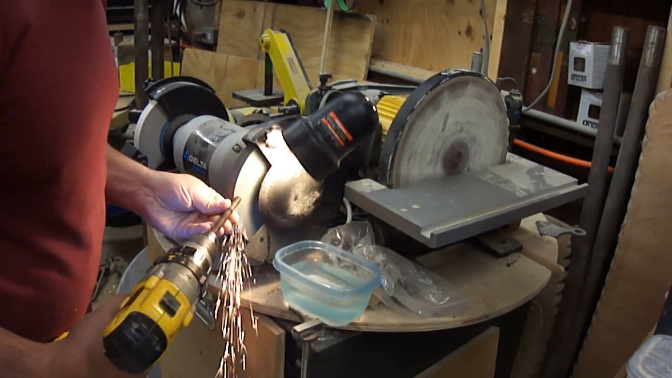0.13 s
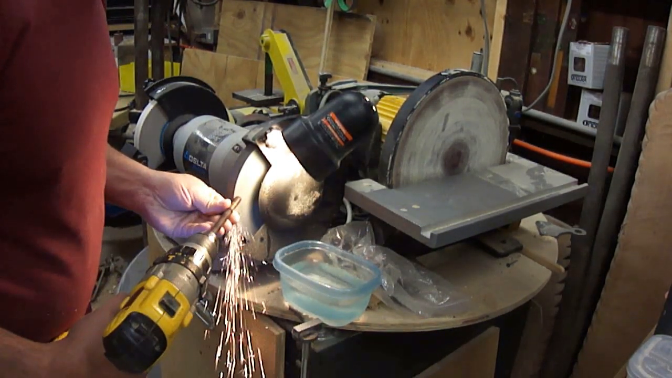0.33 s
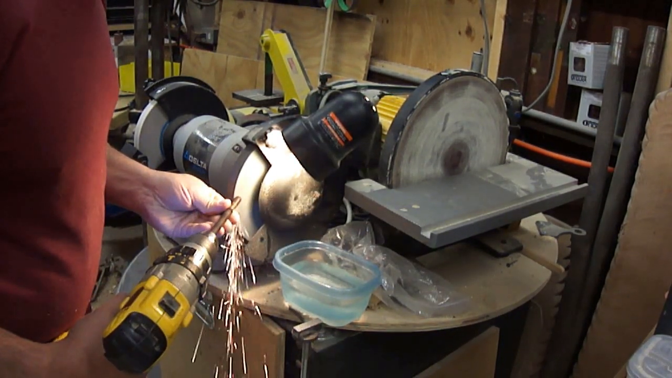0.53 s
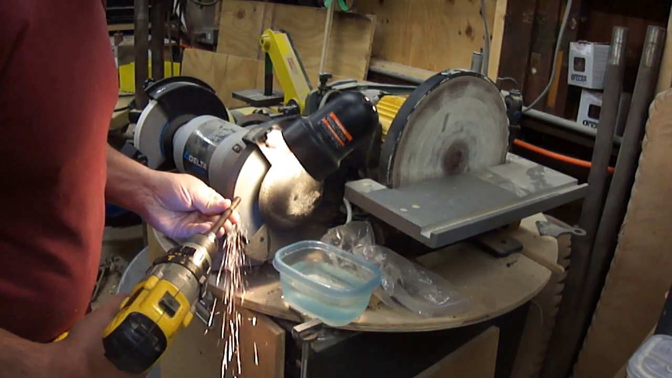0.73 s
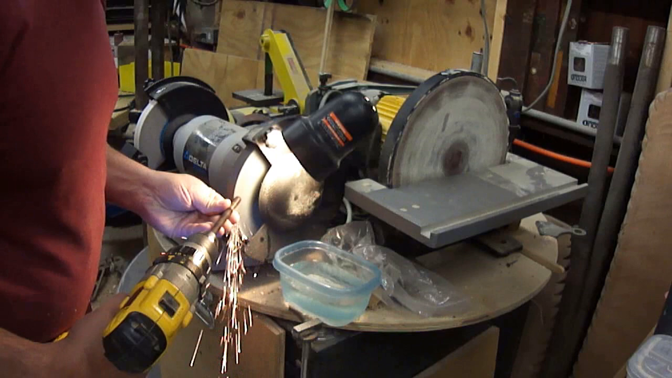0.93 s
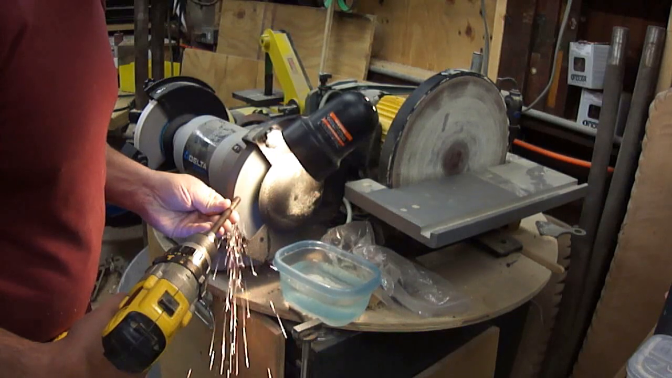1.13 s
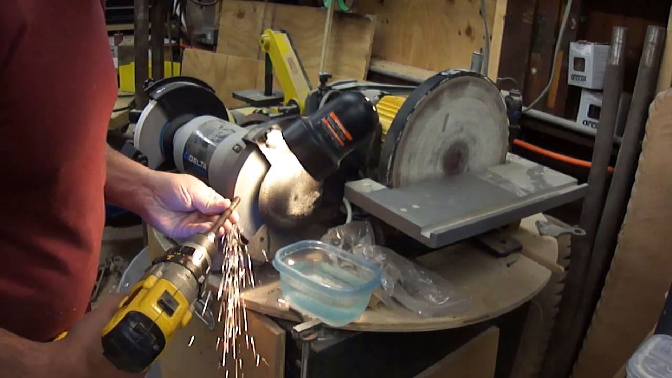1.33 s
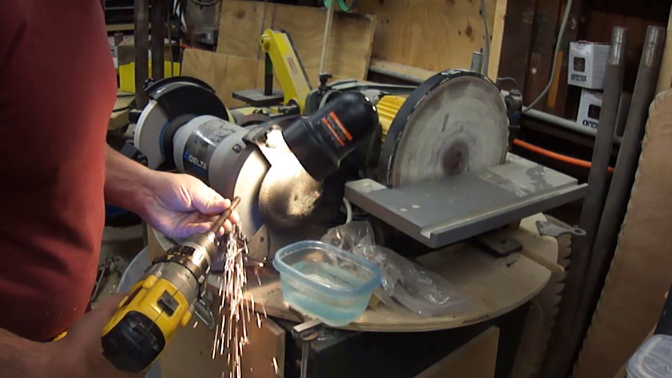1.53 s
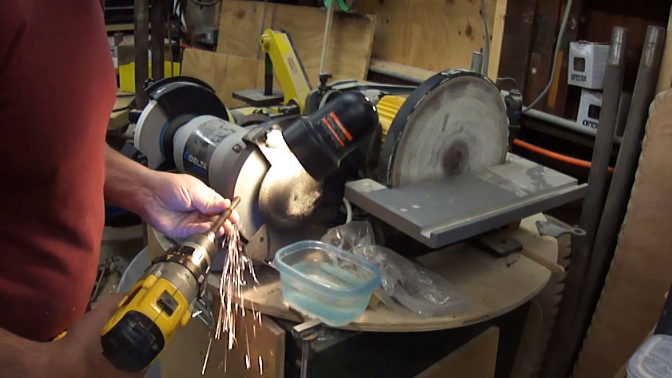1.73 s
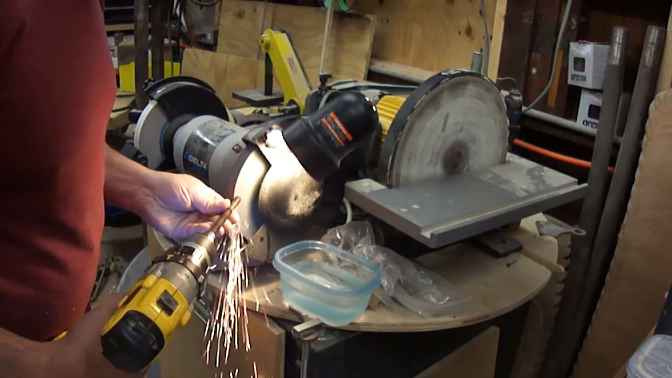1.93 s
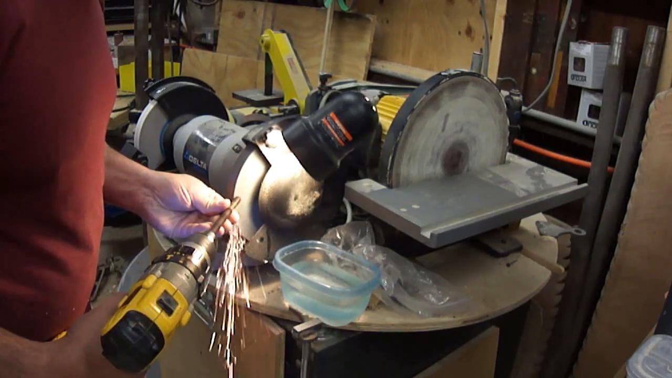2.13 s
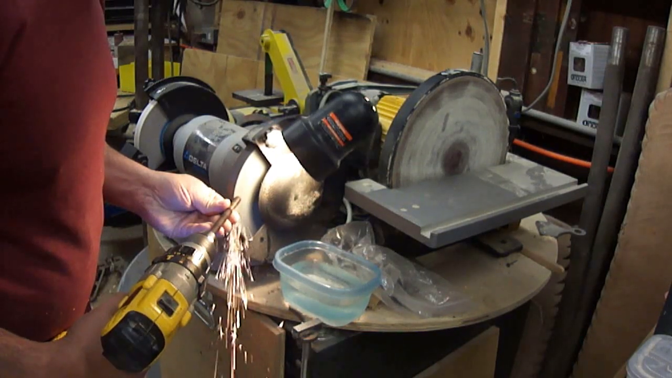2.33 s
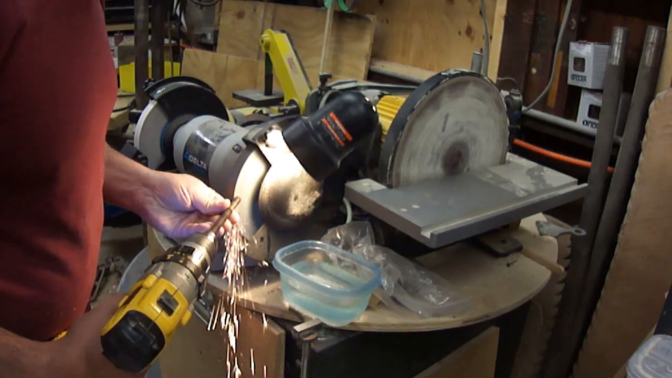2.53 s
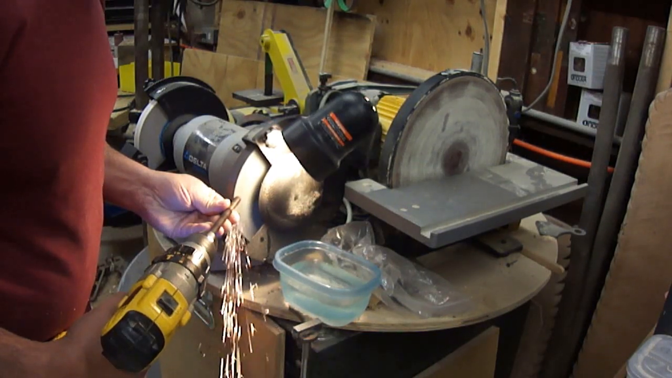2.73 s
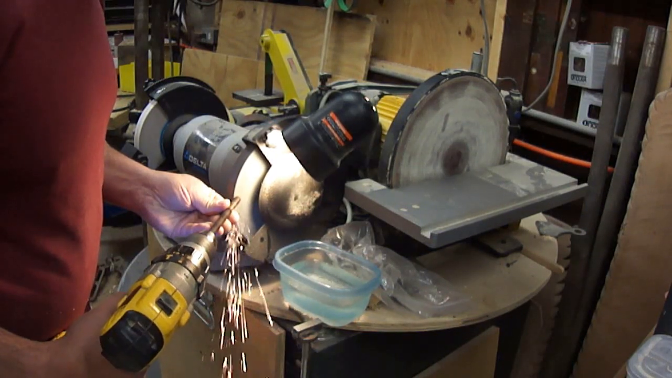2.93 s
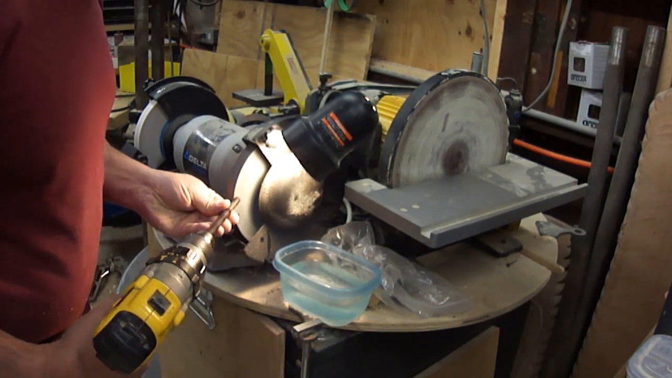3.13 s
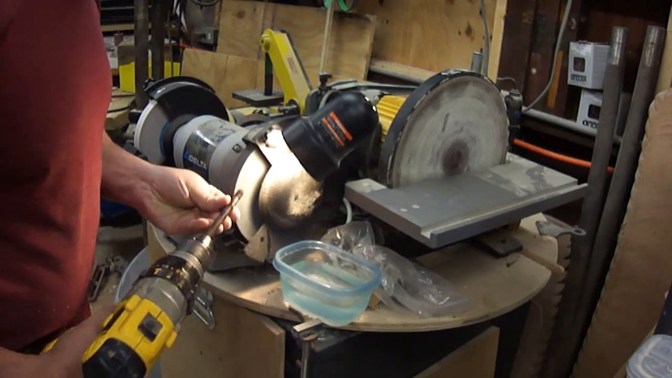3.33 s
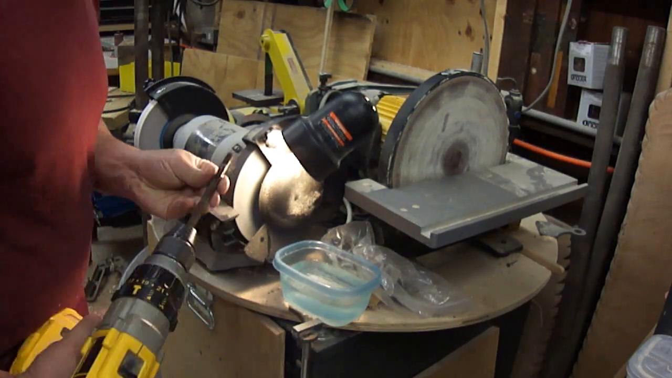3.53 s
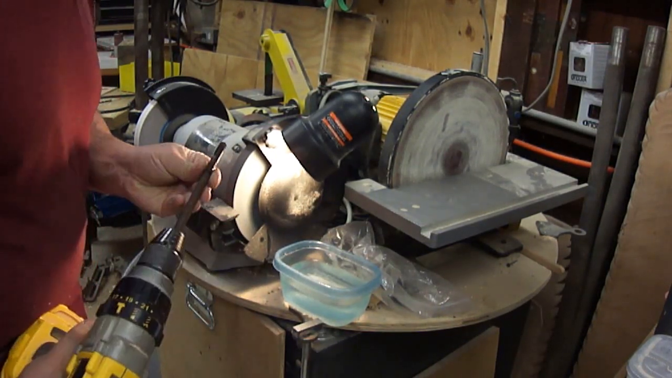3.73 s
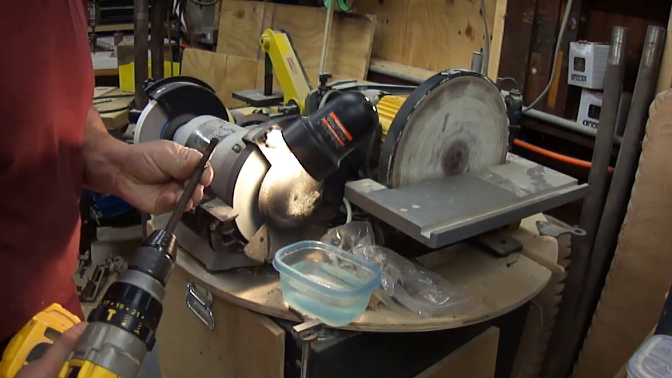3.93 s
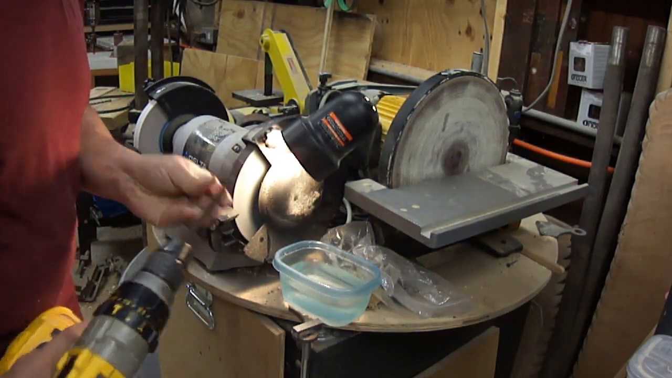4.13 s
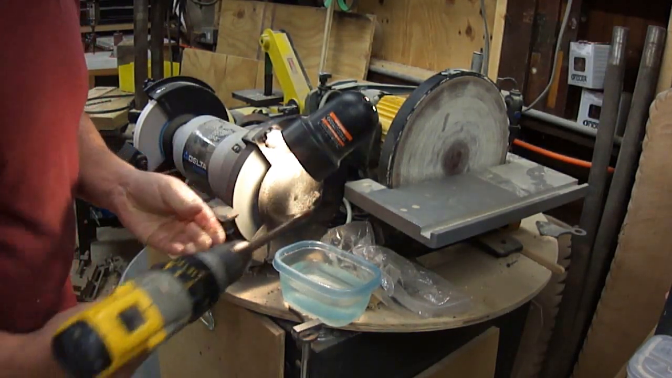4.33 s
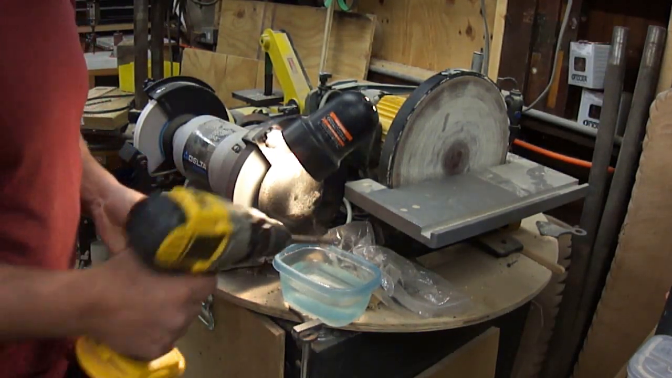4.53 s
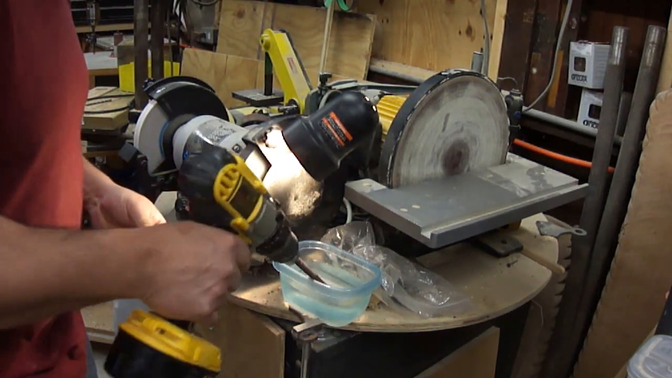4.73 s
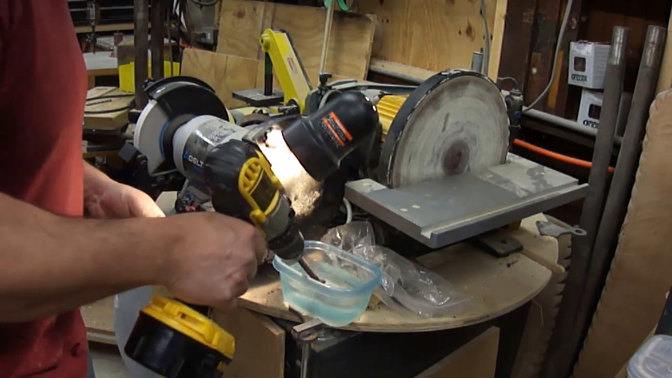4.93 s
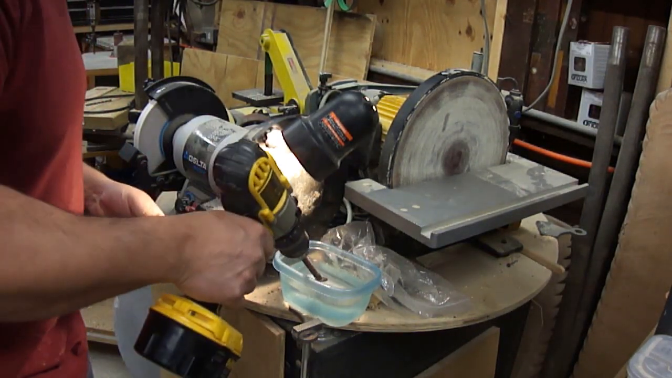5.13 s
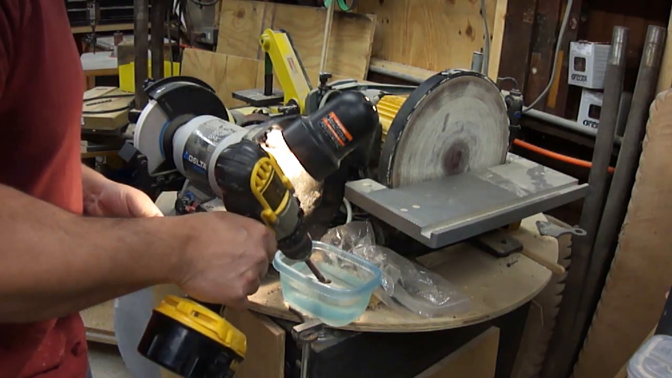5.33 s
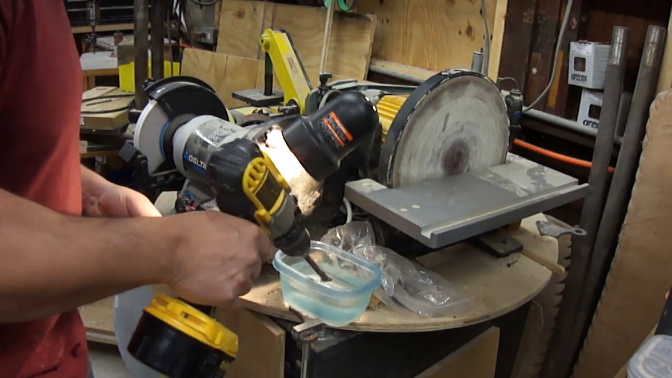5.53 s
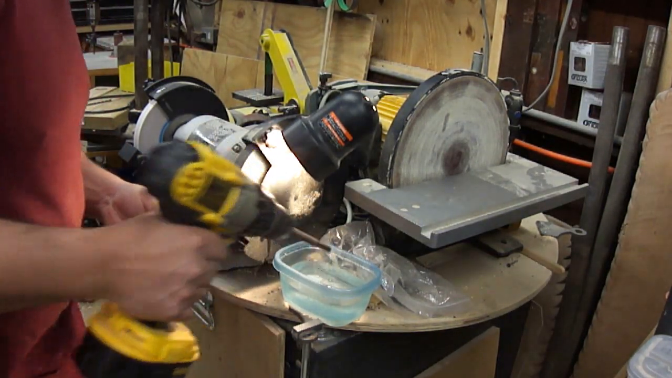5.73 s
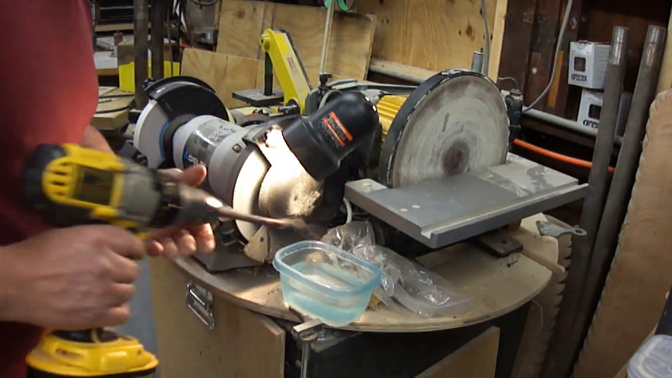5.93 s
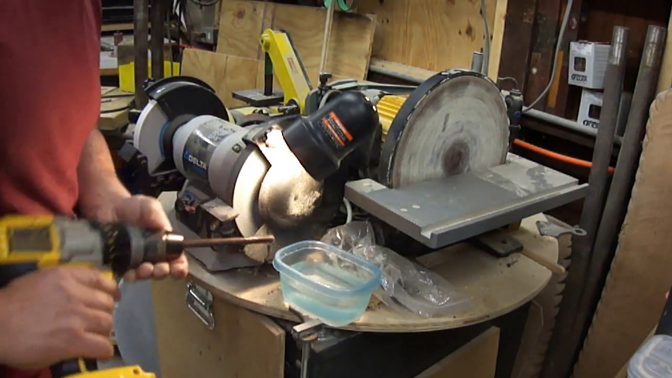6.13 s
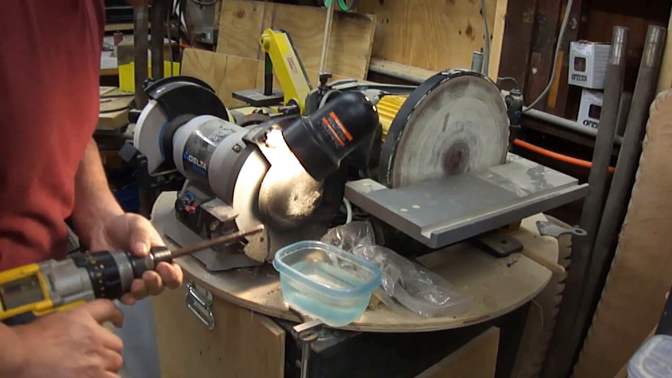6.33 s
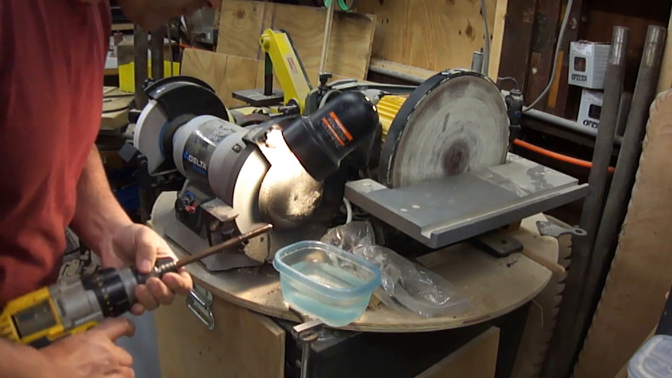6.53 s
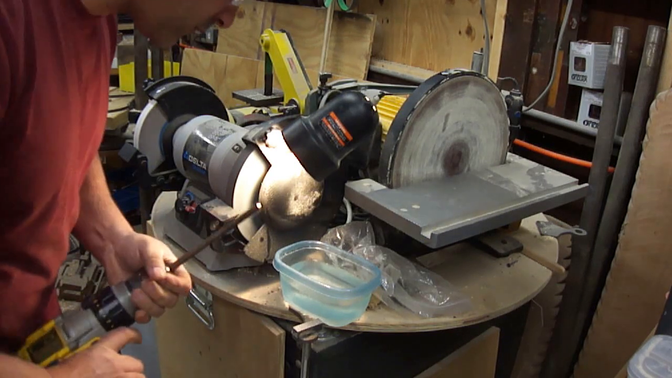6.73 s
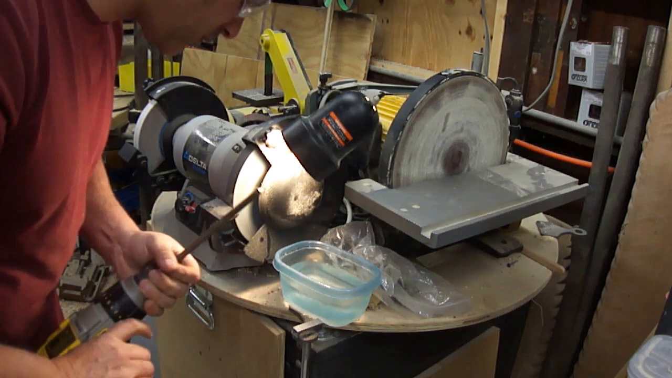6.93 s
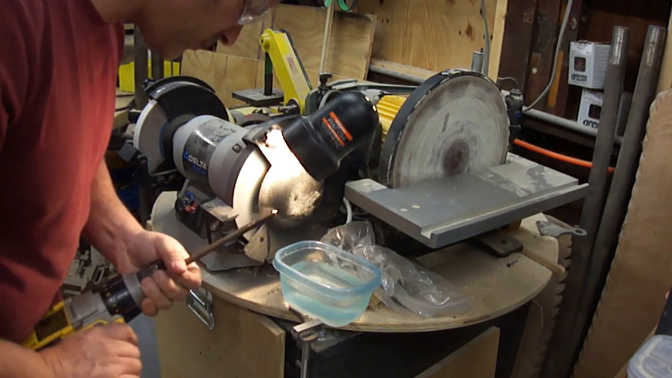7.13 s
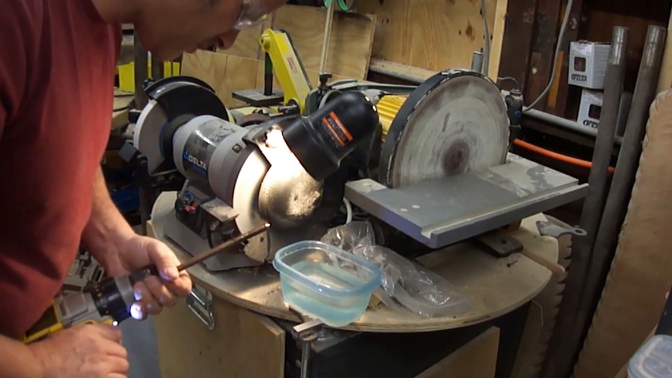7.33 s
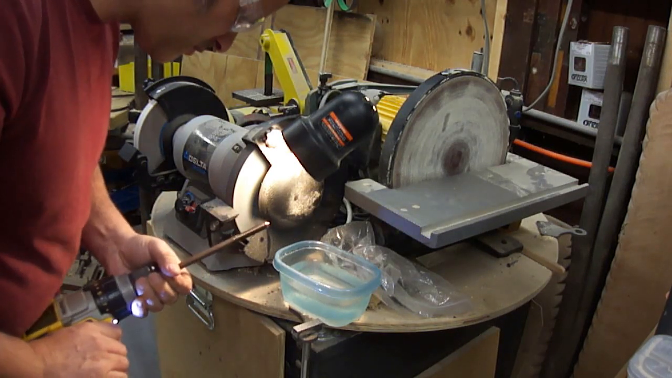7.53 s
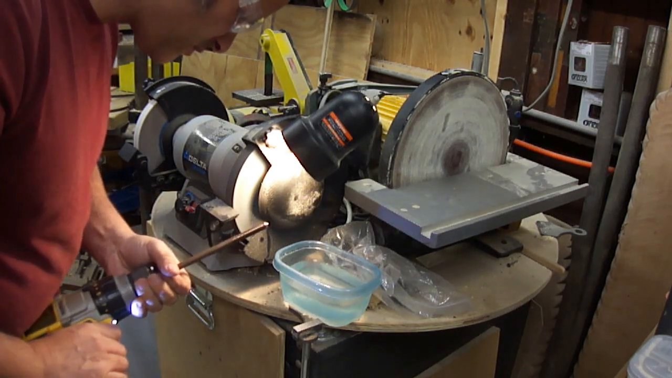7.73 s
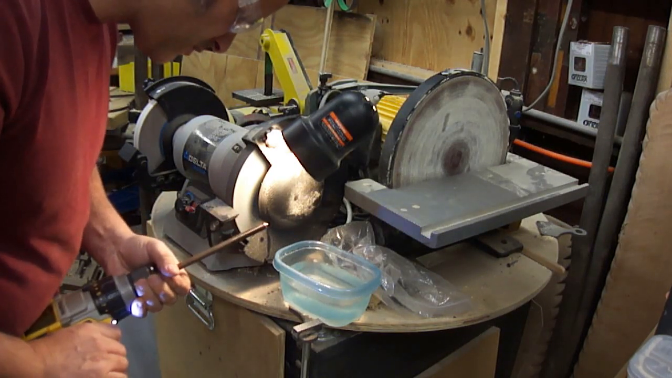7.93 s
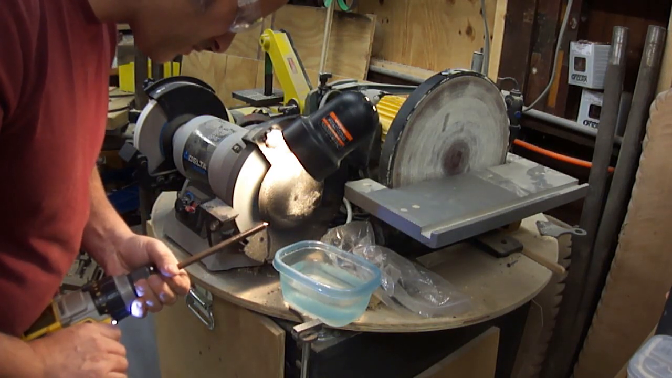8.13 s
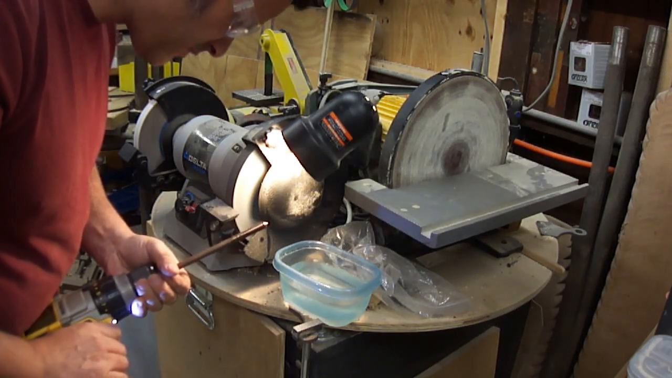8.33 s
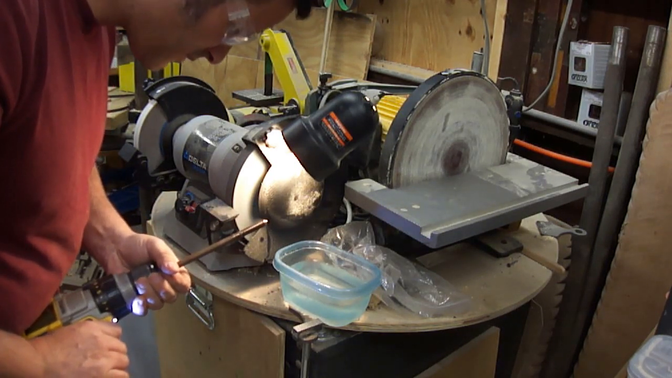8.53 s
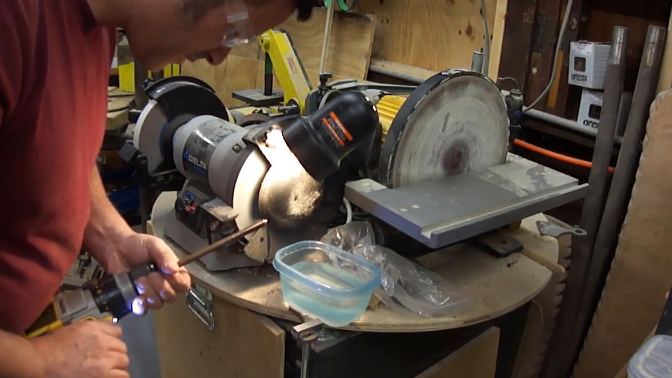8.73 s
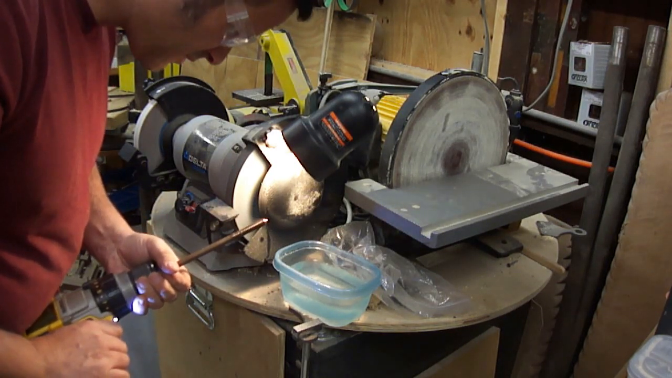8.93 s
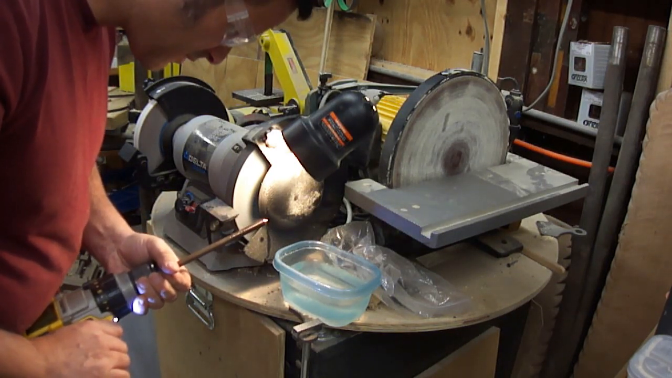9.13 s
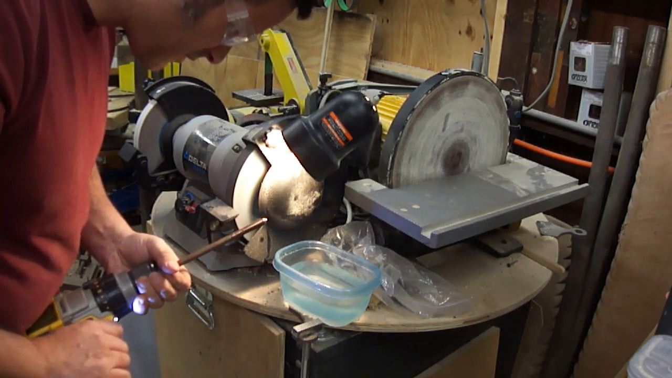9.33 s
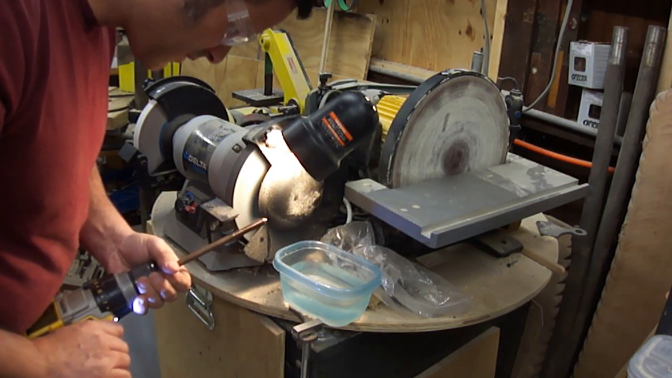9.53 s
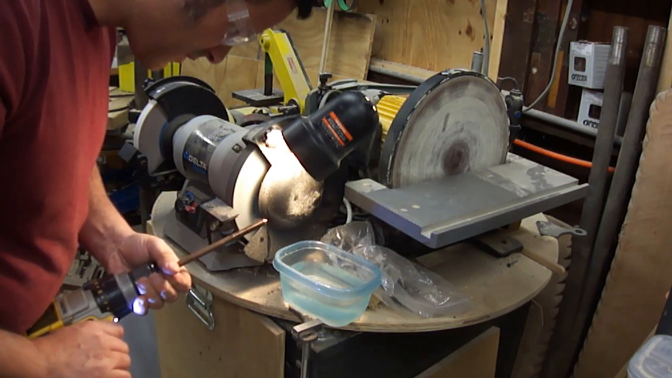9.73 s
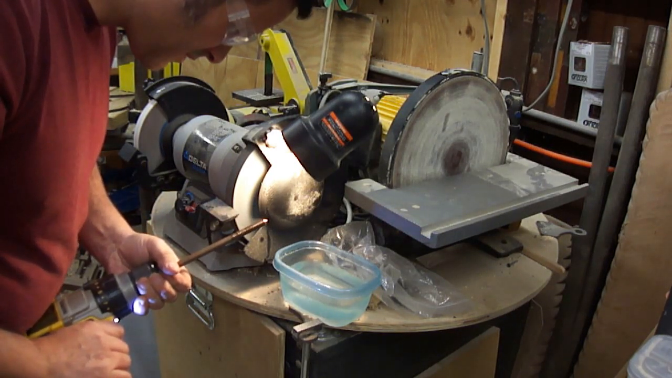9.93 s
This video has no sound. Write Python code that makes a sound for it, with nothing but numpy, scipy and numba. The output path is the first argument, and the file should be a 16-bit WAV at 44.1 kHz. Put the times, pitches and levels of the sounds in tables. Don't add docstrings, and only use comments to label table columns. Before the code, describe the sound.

In a small wooden workshop, a spinning steel rod grinds on a bench wheel with a loud bright scrape, metallic ringing and low thrum. It lifts off with a plastic snap, leaving a faint grinder hum and guard rattle that slowly swell. A loud trigger click follows, then chirps, a thin whistle and a cordless drill whining up, holding and coasting down. The close microphone is thin in bass and its gain adjusts automatically.

```python
import sys
import numpy as np
from scipy import signal
from scipy.fft import rfft, irfft, next_fast_len
from scipy.io import wavfile
from scipy.ndimage import uniform_filter1d
from numba import njit

SR = 44100
rng = np.random.default_rng(int(sys.argv[2]) if len(sys.argv) > 2 else 0)


def volts_from_decibels(level):
    exponent = np.asarray(level, float) / 20
    return 10 ** exponent


def pcm_store(signal):
    levels = np.round(np.clip(np.atleast_2d(signal), -1, 1) * 32767)
    wavfile.write(sys.argv[1], SR, levels.astype(np.int16).T)


N = 439677

# turn_multiple, level_db
HUM_TONES = [(1, -35), (2, -16.5), (3, -19), (4, -11.5), (5, -5), (6, -14.5), (8, -6), (10, -5), (16, -15),
             (17, 0.5), (19, -12.5), (22, -9), (24, -9.5), (26, -8.5), (27, -8.5), (44, -3)]
# turn_multiple, level_db
EARLY_TONES = [(12, -1), (19, 0), (22, -6)]
# pitch_hz, level_db
STEADY_TONES = [(599.6, -3), (3180, -5), (3203, -4), (3238, -8), (3371, -5), (3400, -8), (4039, -10),
                (4130, -10)]
# pitch_hz, width_hz, level_db
BEARING_MODES = [(486, 14, -5), (559, 10, -8), (676, 10, -10), (1976, 20, -10), (2113, 25, -7),
                 (2316, 20, -10), (2682, 15, -8), (3040, 25, -11), (3180, 16, -9), (3203, 14, -8),
                 (3235, 20, -7), (3371, 16, -8), (3400, 14, -8), (3859, 15, -11), (4039, 16, -7),
                 (4130, 25, -8), (4268, 20, -9)]
# frequency_hz, level_db (per Hz)
HOUSING_NOISE = [(24, -74), (40, -56), (171, -22), (249, -6.5), (606, -1.5), (748, -6.5), (860, 0),
                 (1580, -11), (2050, -6), (2840, -8.5), (3270, -6.5), (3680, -9), (4130, -6.5),
                 (10800, -23), (14000, -76), (22000, -120)]
# pitch_hz, width_hz, level_db
GUARD_MODES = [(880, 39, -11), (1381, 42, -6), (2030, 41, -7), (3253, 104, -5.5), (3870, 130, -27.5),
               (5360, 160, -8), (5830, 40, -6.5), (6740, 52, -7.5), (7250, 15, -2)]
# start_s,
# bass_above_treble_db
BODY_LEAN = [(3.3, 4.5), (3.9, 1.5), (4.6, 1.5), (5.1, 0.5), (5.7, 3.5), (5.95, 3.5), (6.4, 0.5), (7.0, 1),
             (7.45, -1), (8.8, 1.5), (9.2, 1), (9.5, 3), (9.97, -4)]
# turn_multiple, start_s, end_s, rise_s, level_db
GLINTS = [
    (44, 7.15, 7.43, .2, -28),
    (27, 5.78, 6.1, .04, -32),
    (26, 5.78, 5.95, .04, -32),
    (24, 7.28, 7.43, .05, -35),
    (8, 6.3, 7.43, .1, -36),
]
# start_s, seating_firmness_db, second_mode_set_db (as the contact slides along)
ROD_CONTACT = [
    (0.0, -4, -12),
    (0.28, -1, -10),
    (0.75, 0, -15),
    (1.4, -3.5, -15),
    (1.72, -4.5, -6.5),
    (2.05, -2, -11),
    (2.45, 0, -6),
    (2.9, -5, -11),
    (3.1, -5.5, -14),
]
# frequency_hz, level_db (per Hz)
SCRAPE_NOISE = [(440, -53), (750, -12.5), (1120, -6.5), (2050, -3), (2830, 0), (3270, -2.5), (5230, -4.5),
                (5720, 0.5), (6250, -4), (8540, -11.5), (9450, -7), (10800, -10.5), (14000, -72),
                (22000, -120)]
# pitch_hz, width_hz, level_db
ROD_MODES = [(2610, 110, -11), (2938, 8.3, -9.5), (4005, 66, -5.5), (4700, 200, -20), (5634, 25, -10),
             (6100, 34, -22), (7070, 46, -13.5), (7240, 14, -48), (7740, 100, -24), (9230, 30, -9),
             (10300, 15, -8)]
# pitch_hz, width_hz, level_db
REST_MODES = [(1140, 59, -2.5), (1500, 22, -16.5), (1900, 78, -11), (2312, 39, 0)]
# turn_multiple, level_db
ROD_TONES = [(112, -17), (113, -11), (114, 3), (115, -7.5), (116, -29), (118, -4), (157.5, -15),
             (185.5, -16), (186, -5.5), (187, -22), (192, -20), (193, -15), (293, -26), (300, -9)]
# turn_multiple, level_db
SECOND_ROD_TONES = [(55, 1), (56, -18), (59, 4.5)]
# turn_multiple, level_db
THRUM_TONES = [(2, -19), (3, -17.5), (8, -6.5), (10, 3), (11, -5), (12, 2.5), (13, -4), (14, -8), (23, -25),
               (28, -1.5), (29, -7), (32, -34), (36, -17), (39.4, 2), (44, -6)]
# frequency_hz, level_db (per Hz)
SHAFT_NOISE = [(200, -23), (370, -13.5), (520, 1), (720, -9), (1000, -42), (1100, -40), (1200, -45)]
# pitch_hz, level_db
DRILL_CASING = [(470, -62), (680, -33), (790, -25.5), (880, -16), (945, -21), (1005, -25), (1035, -22.5),
                (1056, -20.5)]
# motor_tone_multiple, level_db
DRILL_SLOTS = [(2, -24), (6, -24), (7, -18.5), (8.05, -28), (9, -27), (10, -28)]
# frequency_hz, level_db (per Hz)
GEAR_NOISE = [(710, -43), (1200, -12.5), (1730, -12.5), (1940, -8.5), (2870, -10), (4270, -5.5),
              (4720, -11.5), (6000, -11), (7690, -21.5), (10800, -24), (14000, -68), (22000, -120)]
# centre_s, half_length_s, top_hz, droop_hz, level_db
SWITCH_CHIRPS = [
    (7.59, .068, 4675, 110, -25.5),
    (7.715, .012, 3880, 100, -28),
    (7.808, .04, 4230, 280, -25.5),
]
# start_s, peak_db, ring_hz
CLICKS = [
    (3.1413, -5.5, 4100),
    (7.4325, -0.5, 3500),
    (4.262, -21, 2500),
]
# frequency_hz, level_db
MIC_RESPONSE = [(40, -17.5), (150, -10.5), (300, 0), (10900, 1.5), (11030, -9), (13000, -11),
                (14200, -17.5), (15100, -33)]

LIFT_S, EASE_S, TRIGGER_S, RELEASE_S = 3.14, .045, 7.47, 9.23
STEP_S, STEP_LENGTH_S = 5.43, 0.54
BITE_RATE, LOADED_RATE, FREE_RATE, SETTLE_S, RECOVER_S = 49.328, 49.423, 50.87, .6, .45
WINDING_HZ = 599.6
LOADED_DB, SHUT_DB, CREEP_DB_PER_S, CEILING_DB = -48.5, -38.5, 4.8, -26
RECOIL_DB, RECOIL_S = -3, 0.19
SINK_FROM_S, SINK_DB_PER_S, CLIMB_DB_PER_S = 7.7, 4.5, 12.5
LEAN_MIDDLE = 0.54
SHADED_DB, OPEN_DB = -2.5, -10
PRESS_DB, RING_DB, LIFT_DB_PER_S = -22.5, -2, 147
TOP_TONE_HZ, SPIN_UP_S, COAST_HZ_PER_S, COAST_DB = 1056, .31, 1300, -3
GEARS_DB, GEARS_DB_PER_OCTAVE, STOP_S, STOP_DB_PER_S = -21.5, 2.5, 9.54, 21
HOLD_S, HOLD_HZ, SCOOP_HZ, SCOOP_S = 7.848, 4400, 440, .038
HOLD_DB, HOLD_FADE_DB, HOLD_FADE_S = -34, 9, .25
ROOM_T60_S, ROOM_DB = .3, -10
LOST_HZ, TOP_HZ = (11040, 12930), 15140
DROPOUT_S = .19, .1947


def along(table):
    s, *columns = np.transpose(table)
    return [np.interp(np.arange(N) / SR, s, c) for c in columns]


def unit(x):
    return x / np.sqrt(np.mean(x ** 2))


def colour(x, spectrum=((50, -200), (99, -200), (0, 0), (0, 0)), modes=(), spectrum_db=0):
    size = next_fast_len(N + SR // 2)
    hz = np.arange(size // 2 + 1) * SR / size + 1
    points = np.array(spectrum, float)[:-2]
    broad_db = np.interp(np.log(hz), np.log(points[:, 0]), points[:, 1])
    gain = volts_from_decibels(spectrum_db + broad_db) + 0j
    for centre_hz, width_hz, db in modes:
        gain += volts_from_decibels(db) / (1 + 2j * (hz - centre_hz) / width_hz)
    return unit(irfft(rfft(x, size) * gain, size)[:N])


def walk(rate):
    place = np.arange(0, N, 32) * rate / SR
    levels = np.interp(place, np.arange(3000), rng.standard_normal(3000))
    return 1.15 * np.repeat(levels, 32)[:N]


def surface(turns, memory, fresh, size=800):
    grains = rng.standard_normal((600, size))
    grit = signal.lfilter([1], [1, -memory], grains, axis=0)[40:].ravel()
    repeating = unit(np.interp(turns * size, np.arange(len(grit)), grit))
    return repeating + fresh * rng.standard_normal(N)


def throb(turns, depths_db):
    return volts_from_decibels(sum(db * np.cos(2 * np.pi * (k + 1) * turns + k) for k, db in enumerate(depths_db)))


def tones(turns, table, flutter_db, sway, rate):
    out = np.zeros(len(turns))
    for k, db in table:
        flutter = walk(rate)[:len(turns)]
        drift = walk(rate)[:len(turns)]
        phase = 2 * np.pi * k * turns + k * k + sway * drift
        out += volts_from_decibels(db + flutter_db * flutter) * np.cos(phase)
    return np.pad(unit(out), (0, N - len(turns)))


def wheel():
    t = np.arange(N) / SR
    loaded = LOADED_RATE - (LOADED_RATE - BITE_RATE) * np.exp(-t / SETTLE_S)
    rate = FREE_RATE - (FREE_RATE - loaded) * np.exp(-np.maximum(t - LIFT_S, 0) / RECOVER_S)
    return np.cumsum(rate) / SR


def idle_gain():
    t = np.arange(N) / SR
    since = np.maximum(t - LIFT_S - .15, 0)
    opening = SHUT_DB + CREEP_DB_PER_S * since + RECOIL_DB * np.exp(-since / RECOIL_S)
    creep = np.minimum(opening, CEILING_DB)
    sink = SINK_DB_PER_S * np.clip(t - SINK_FROM_S, 0, RELEASE_S - SINK_FROM_S)
    sink -= CLIMB_DB_PER_S * np.maximum(t - RELEASE_S - .2, 0)
    free_db = uniform_filter1d(creep - np.maximum(sink, 0), SR // 8)
    return np.where(t < LIFT_S, LOADED_DB, free_db)


def glints(turns):
    t = np.arange(N) / SR
    out = np.zeros(N)
    for k, start, end, rise, db in GLINTS:
        shape = np.interp(t, (start, start + rise, end, end + 0.011), (0, 1, 1, 0))
        out += volts_from_decibels(db) * shape * np.sqrt(2) * np.cos(2 * np.pi * round(k) * turns)
    return out


def grinder(turns):
    t = np.arange(N) / SR
    lean_db = along([(LIFT_S, 0)] + list(BODY_LEAN))[0]
    level_db = idle_gain() + lean_db
    middle_db = (LEAN_MIDDLE - 1) * lean_db + 0.36
    before_step = np.clip((STEP_S - t) / STEP_LENGTH_S + .5, 0, 1) * (t > LIFT_S)

    body = colour(surface(turns, memory=0.874, fresh=2.9), HOUSING_NOISE, GUARD_MODES, spectrum_db=2.5)
    body += volts_from_decibels(-5.0) * colour(rng.standard_normal(N), modes=BEARING_MODES)
    body += volts_from_decibels(-6.0 + SHADED_DB * before_step) * tones(turns, HUM_TONES, 0.4, 0.43, 6.6)
    winding = 0.75 * np.cos(2 * np.pi * WINDING_HZ * t + WINDING_HZ ** 2)
    body += volts_from_decibels(OPEN_DB) * before_step * (tones(turns, EARLY_TONES, 0.83, .2, 4.2) + winding)
    body += volts_from_decibels(-8) * tones(t, STEADY_TONES, 1.2, .3, 18)

    low, dull = (signal.sosfilt(signal.butter(2, hz, fs=SR, output="sos"), body) for hz in (750, 1700))
    boom = low + (dull - low) * volts_from_decibels(middle_db)
    boom *= throb(turns, (1.5, .8)) * volts_from_decibels(.5 * walk(12))
    rattle = (body - dull) * throb(turns, (1.7, 0.094, 0.19, 0.35))
    rattle *= volts_from_decibels(-lean_db + 0.32 * walk(14))
    return volts_from_decibels(level_db + 4.5) * (boom + rattle) + glints(turns)


def clicks():
    out, t = np.zeros(N), np.arange(2400) / SR
    band = signal.butter(2, (1200, 8000), "band", fs=SR, output="sos")
    for s, db, hz in CLICKS:
        ring = np.sin(2 * np.pi * hz * t) * np.exp(-t / .0008)
        crackle = rng.standard_normal(len(t)) * (.6 * np.exp(-t / .0015) + .1 * np.exp(-t / .015))
        snap = signal.sosfilt(band, (ring + crackle) * np.minimum(t / .0003, 1))
        start = int(s * SR)
        out[start:start + len(t)] += volts_from_decibels(db) * snap / abs(snap).max()
    return out


def switch():
    t = np.arange(N) / SR
    since = np.maximum(t - HOLD_S, 0)
    hz = HOLD_HZ - SCOOP_HZ * np.exp(-since / SCOOP_S)
    gain = volts_from_decibels(HOLD_DB + HOLD_FADE_DB * np.exp(-since / HOLD_FADE_S)) * (t > HOLD_S)
    gain = gain * np.clip((RELEASE_S - t) / .3, 0, 1)
    for centre, half, top_hz, droop_hz, db in SWITCH_CHIRPS:
        u = (t - centre) / half
        hz = np.where(abs(u) < 1, top_hz - droop_hz * u ** 2, hz)
        gain = gain + volts_from_decibels(db) * np.maximum(1 - u ** 4, 0)
    phase = 2 * np.pi * np.cumsum(hz * (1 + .002 * walk(150))) / SR
    return np.sin(phase) * gain * volts_from_decibels(1.6 * walk(60))


def drill():
    t = np.arange(N) / SR
    powered_s = np.clip(t, TRIGGER_S, RELEASE_S) - TRIGGER_S
    climb = TOP_TONE_HZ * (1 - np.exp(-powered_s / SPIN_UP_S))
    hz = np.maximum(climb - COAST_HZ_PER_S * np.maximum(t - RELEASE_S, 0), 60)
    phase = 2 * np.pi * np.cumsum(hz * (1 + .0012 * walk(60))) / SR

    tone_db = np.interp(hz, *np.transpose([(300, -99)] + list(DRILL_CASING))) + COAST_DB * (t > RELEASE_S)
    flutter_db = (0.85 + 1.4 * (t > RELEASE_S + .08)) * walk(22)
    motor = volts_from_decibels(tone_db + flutter_db) * np.sin(phase)

    slots = sum(volts_from_decibels(db + 2 * walk(8)) * np.sin(k * phase) for k, db in DRILL_SLOTS)
    slots *= volts_from_decibels(np.interp(hz, (800, 900, 980, 1010, 1035), (0, 5, 4, -7, 0)))
    slots *= volts_from_decibels(np.minimum(tone_db, -22)) * (t < 9.2)

    noise_db = GEARS_DB + GEARS_DB_PER_OCTAVE * np.log2(hz / TOP_TONE_HZ)
    noise_db = noise_db - STOP_DB_PER_S * np.maximum(t - STOP_S, 0) - 99 * (t < TRIGGER_S - .03)
    chatter = rng.standard_normal(N) * volts_from_decibels(0.67 * walk(25) + 0.38 * walk(200))
    gears = volts_from_decibels(noise_db) * colour(chatter, GEAR_NOISE)
    return np.sqrt(2) * (motor + slots + switch()), gears


def grinding(turns):
    t = np.arange(N) / SR
    seat_db, second_db = along(ROD_CONTACT)
    lift_db = -LIFT_DB_PER_S * np.maximum(t - LIFT_S + EASE_S, 0)
    press_db = PRESS_DB + 0.033 * seat_db + 0.52 * walk(9.3) + lift_db
    ring_db = RING_DB + seat_db + .7 * walk(14) + lift_db
    second_db = second_db + 0.28 * walk(9.6) + lift_db

    spin = np.cumsum(27 * (1 + 0.052 * walk(1.99))) / SR
    touch = throb(turns, (1.8, .6)) * throb(spin, (1.2,)) * volts_from_decibels(.5 * walk(11))
    grit = touch * surface(turns, memory=0.835, fresh=2.7)
    scrape = colour(grit, SCRAPE_NOISE, list(REST_MODES) + list(ROD_MODES))

    held = turns[:int(3.25 * SR)]
    sing = tones(held, ROD_TONES, 2.2, .4, 60) * throb(spin, (2.2,))
    second = tones(held, SECOND_ROD_TONES, 2.0, .25, 30)

    thrum = tones(held, THRUM_TONES, 1.2, .3, 10)
    thrum += 0.26 * np.cos(2 * np.pi * WINDING_HZ * t)
    thrum += volts_from_decibels(-5.5) * colour(rng.standard_normal(N), SHAFT_NOISE)
    thrum *= volts_from_decibels(np.interp(t, (3.02, 3.12), (0, -9)))

    ringing = volts_from_decibels(ring_db + 1.0) * sing + volts_from_decibels(second_db + 2.0) * second
    return volts_from_decibels(press_db) * (scrape + ringing + volts_from_decibels(-10.5) * thrum)


def scene():
    turns = wheel()
    whine, gears = drill()
    near = grinding(turns) + gears + clicks()
    t = np.arange(SR // 2) / SR
    tail = rng.standard_normal(len(t)) * np.exp(-np.log(1000) * t / ROOM_T60_S) * (t > .004)
    tail /= np.sqrt(np.sum(tail ** 2))
    wet = signal.fftconvolve(near + .4 * whine, tail)[:N]
    return (grinder(turns) + near + whine + volts_from_decibels(ROOM_DB) * wet)[None]


@njit
def duck(x, top, release):
    gain, held = np.empty(len(x)), 1.
    for i in range(len(x)):
        held = max(abs(x[i]) / top, held + (1 - held) * release)
        gain[i] = 1 / held
    return gain


def band_limit(x):
    return signal.sosfilt(signal.butter(12, 15610, fs=SR, output="sos"), x)


def record(dry):
    gain = duck(dry[0], 0.52, 1 / (.06 * SR))
    gain = uniform_filter1d(np.roll(gain, 90), 60)
    limited = np.clip(dry * gain, -.92, .92)

    size = next_fast_len(N)
    hz = np.arange(size // 2 + 1) * SR / size + 1
    mic_hz, mic_db = np.transpose(MIC_RESPONSE)
    response = volts_from_decibels(np.interp(np.log(hz), np.log(mic_hz), mic_db))
    response[((hz > LOST_HZ[0]) & (hz < LOST_HZ[1])) | (hz > TOP_HZ)] = 0
    heard = irfft(rfft(limited, size) * response, size)[:, :N]

    t = np.arange(N) / SR
    mix = heard * ((t < DROPOUT_S[0]) | (t > DROPOUT_S[1]))
    return band_limit(mix)


dry = scene()
out = record(dry)
pcm_store(out)
```